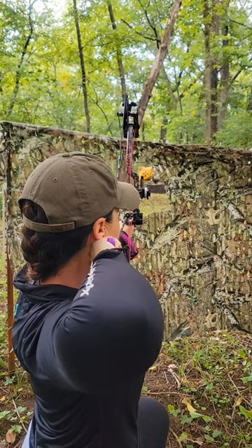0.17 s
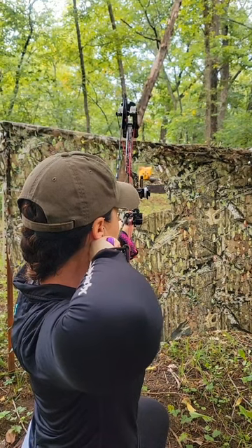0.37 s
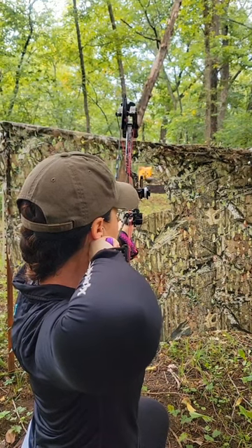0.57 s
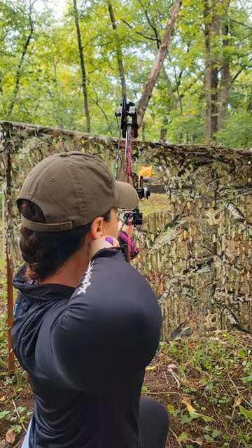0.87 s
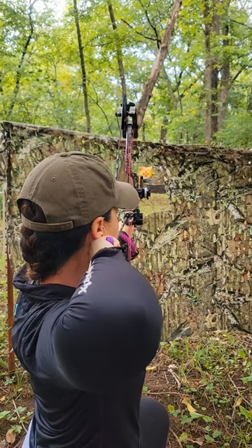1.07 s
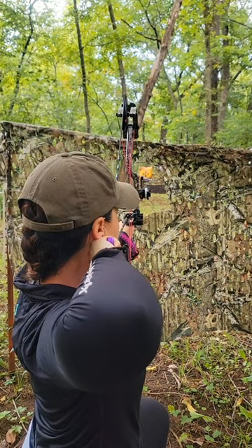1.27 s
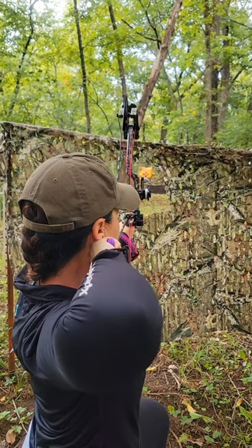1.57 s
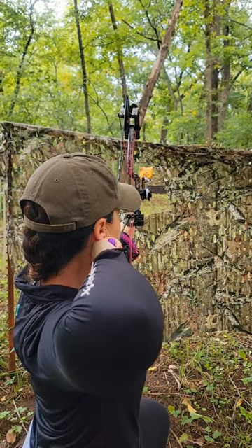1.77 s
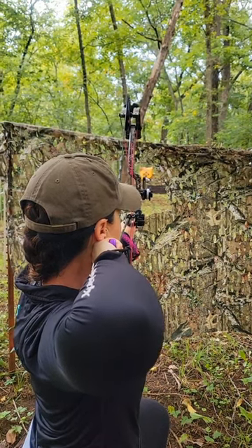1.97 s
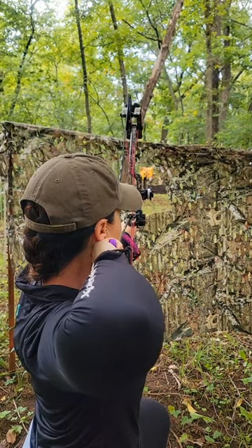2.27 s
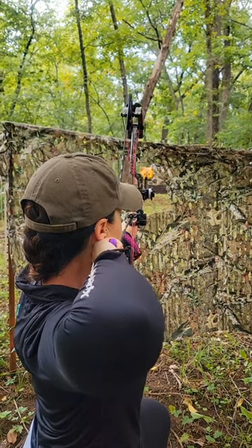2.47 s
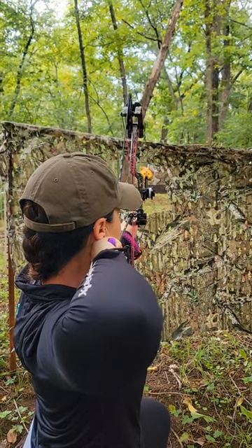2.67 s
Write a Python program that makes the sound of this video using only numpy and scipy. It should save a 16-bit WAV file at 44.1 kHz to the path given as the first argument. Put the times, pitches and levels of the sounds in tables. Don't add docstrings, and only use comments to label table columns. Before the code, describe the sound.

Cicadas buzz in a steady high chorus in the woods, over faint distant road noise

```python
import sys
import numpy as np
from scipy import signal
from scipy.fft import rfft, irfft
from scipy.io import wavfile
from scipy.ndimage import uniform_filter1d

SR = 44100
rng = np.random.default_rng(int(sys.argv[2]) if len(sys.argv) > 2 else 0)


def natural_amplitude(level_db):
    exponent = np.asarray(level_db, float) / 20
    return 10 ** exponent


def waveform_to_disk(signal):
    frames = np.transpose(np.atleast_2d(signal))
    scaled = np.clip(frames, -1, 1) * 32767
    samples = np.round(scaled).astype(np.int16)
    wavfile.write(sys.argv[1], SR, samples)


N = 124803


def evened(x):
    return x / np.sqrt(np.mean(x ** 2) + 1e-20)


def read(points, hz):
    f, value = np.transpose(points)
    return np.interp(np.log(hz + 1), np.log(f + 1), value)


def panned(x, db):
    return x * natural_amplitude([[db / 2], [-db / 2]])


def late(x):
    return np.array([np.roll(x, -3), x])


def coloured(x, points):
    hz = np.fft.rfftfreq(N, 1 / SR)
    inside = (hz > points[0][0]) & (hz < points[-1][0])
    return evened(irfft(rfft(x) * natural_amplitude(read(points, hz)) * inside, N))


def drift(top_hz):
    t = np.arange(N) / SR
    waves = [np.sin(2 * np.pi * (f * t + rng.random())) / np.sqrt(f) for f in np.geomspace(.4, top_hz, 16)]
    return evened(sum(waves))


def resonate(x, hz, width):
    turn = np.exp(2j * np.pi * np.cumsum(hz * np.ones(x.shape[-1])) / SR)
    r = np.exp(-np.pi * width / SR)
    return (turn * signal.lfilter([1], np.convolve([1, -r], [1, -r]), x / turn)).real


# (frequency [Hz], coherence [0-1])
COHERENCE = [(30, .84), (150, .8), (330, .6), (800, .52), (1500, .45), (2500, .3), (4000, .15), (5000, .0)]


def far_noise():
    hz = np.fft.rfftfreq(N, 1 / SR)
    own, common = rfft(rng.standard_normal((2, N)))
    same = np.clip(read(COHERENCE, hz), 0, 1)
    early = np.exp(2j * np.pi * hz * 7 / SR)
    left = same * common * early + np.sqrt(1 - same ** 2) * own
    return irfft(np.array([left, common]), N)


# (frequency [Hz], level [dB per Hz])
HISS = [(1500, 6.5), (3000, -6), (4300, -4), (7400, -3), (8600, 0.5), (10000, 0.5), (13500, 2), (15800, 0)]


def hiss():
    return natural_amplitude(-74) * panned(coloured(rng.standard_normal((2, N)), HISS), 3.5)


# (frequency [Hz], level [dB per Hz])
RUMBLE = [(12, -22), (20, -23.5), (44, 1), (60, 2.5), (107, -1.5), (163, -12), (188, -12), (221, -5),
          (330, -8.5), (430, -35), (730, -120)]
ROAR = [(150, -35), (250, -31), (375, -7), (431, -6.5), (511, -3.5), (600, -4), (1160, -5), (1650, -15.5),
        (3200, -54.5), (4160, -40), (7040, -120)]
# (frequency [Hz], width [Hz], level [dB])
HUMS = [(61.3, 9.7, -75), (104.9, 24, -83), (517.3, 4.1, -71.5), (806, 110, -67)]
# (loudest time [s], length [s], level [dB], drone [Hz], level of upper resonances [dB])
PASSES = [
    (0.496, .17, -55, 795, 1),
    (2.544, 0.11, -58, 769, -8.5),
]
# (multiple of drone [1], width [Hz], level [dB])
DRONE = [(1, 150, -1), (1.19, 150, 2), (1.38, 250, -3), (2.15, 300, -20)]


def road():
    t, air = np.arange(N) / SR, far_noise()
    out = natural_amplitude(-66 + 0.4 * drift(13)) * coloured(far_noise(), RUMBLE)
    out = out + natural_amplitude(-59.5 + 1.8 * drift(6.8)) * coloured(far_noise(), ROAR)
    out = out + sum(natural_amplitude(db) * evened(resonate(air, hz, w)) for hz, w, db in HUMS)
    for s, length, db, hz, upper_db in PASSES:
        drone = 0
        for multiple, width, level_db in DRONE:
            gain = natural_amplitude(level_db + upper_db * (multiple > 1.1))
            drone = drone + gain * evened(resonate(air, multiple * hz, width))
        out = out + natural_amplitude(db) * evened(drone) / (1 + ((t - s) / length) ** 2)
    return panned(out, -2.5)


# (time [s], level [dB], frequency [Hz], t60 [s])
TICKS = [
    (2.242, -64, 1850, .035),
    (2.635, -68, 2600, .035),
    (2.645, -79, 2850, .4),
]


def ticks():
    t, out = np.arange(N) / SR, 0
    for s, db, hz, t60 in TICKS:
        u = np.maximum(t - s, 0)
        envelope = np.minimum(u / 0.0011, 1) * natural_amplitude(db - 60 * u / t60)
        out = out + evened(resonate(rng.standard_normal(N), hz, 600)) * envelope
    return panned(late(out), -3)


# (start [s], level [dB], frequency [Hz], t60 [s])
CAWS = [
    (1.135, -70, 2020, 1.8),
    (1.57, -76, 2200, 1.2),
]


def caws():
    t, out = np.arange(N) / SR, 0
    fall_per_s, width_hz, attack_s, grain_db = 0.061, 350, 0.012, 2
    for s, db, hz, t60 in CAWS:
        u = np.maximum(t - s, 0)
        pitch = hz * (1 - fall_per_s * np.minimum(u, .5))
        rasp = evened(resonate(far_noise(), pitch, width_hz))
        grain = grain_db * evened(uniform_filter1d(rng.standard_normal(N), size=700))
        out = out + rasp * np.minimum(u / attack_s, 1) * natural_amplitude(db - 60 * u / t60 + grain)
    return panned(out, -1.9)


def woods(x):
    t = np.arange(SR // 2) / SR
    t60 = 0.66
    tail = rng.standard_normal((2, len(t))) * natural_amplitude(-60 * t / t60) * (t > .012)
    return signal.fftconvolve(x, tail / np.linalg.norm(tail[0]), axes=1)[:, :N]


# (start [s], length [s], level [dB], start frequency [Hz], left-right level [dB])
CHIRPS = [
    (0.426, 0.16, -70.5, 3345, 9),
    (1.745, 0.16, -68, 3347, 0.5),
    (2.697, 0.188, -68.5, 3330, 2),
]


def bird():
    t, out = np.arange(N) / SR, 0
    rise_hz, rough_hz, burr_hz, burr_depth = 190, 45, 108, .8
    peak_at, echo_db = .35, -2.5
    for s, length, db, hz, pan_db in CHIRPS:
        u = np.clip((t - s) / length, 0, 1)
        shape = np.sin(np.pi * u ** (np.log(.5) / np.log(peak_at))) ** 2
        rough = rough_hz * evened(uniform_filter1d(rng.standard_normal(N), size=150))
        tone = np.sin(2 * np.pi * np.cumsum(hz + rise_hz * u + rough) / SR)
        depth = burr_depth * np.minimum(0.15 + 3 * u, 1)
        burr = 1 + depth * np.sin(2 * np.pi * burr_hz * t)
        out = out + natural_amplitude(db) * panned(late(shape * tone * burr), pan_db)
    return out + natural_amplitude(echo_db) * woods(out)


# (place in the stroke [0-1], level [dB])
RIBS = [
    (0.042, -1.5),
    (.3, -17),
    (.55, -10),
    (0.798, -16),
]


def rib_strokes():
    strokes_per_s, rib_s, ring_db = 33.72, 0.0036, -22.5
    turn = np.arange(N) * strokes_per_s / SR - .012 + 0.0074 * drift(13)
    gate = natural_amplitude(ring_db)
    for at, db in RIBS:
        away_s = ((turn - at + .5) % 1 - .5) / strokes_per_s
        gate = gate + natural_amplitude(db) * np.exp(-.5 * (away_s / rib_s) ** 2)
    return evened(gate)


# (frequency [Hz], level [dB per Hz])
SONG = [(2790, -65), (4750, -35), (5110, -17), (5360, -9.5), (5540, -8.5), (5920, 7), (6290, 1),
        (7020, -17), (7300, -31), (9490, -69.5), (16100, -120)][1:-1]
OVERTONE = [(6060, -9), (10300, -10), (10900, 4), (11500, 14.5), (11900, 18.5), (13600, -2)]
# (frequency [Hz], width [Hz], level [dB], left-right level [dB])
BODIES = [(4600, 130, -89, -9.5), (5600, 92, -60.5, -10), (5706, 83, -59, -18.5), (6780, 75, -68, -8.5),
          (7230, 62, -81, -13)]
# (time [s], level [dB])
EFFORT = [(0, -48), (.2, -46.5), (.55, -48), (.9, -46.5), (1.05, -48), (1.3, -47), (1.7, -47.5),
          (2.0, -46.5), (2.35, -47.5), (2.6, -48), (2.83, -48)]


def cicadas():
    s, effort_db = np.transpose(EFFORT)
    effort = natural_amplitude(np.interp(np.arange(N) / SR, s, effort_db - effort_db.mean()))
    gate = rib_strokes()
    buzz = late(gate * rng.standard_normal(N))
    singer = natural_amplitude(-55) * panned(coloured(buzz, SONG), -18)
    chorus = natural_amplitude(-47.5) * panned(coloured(far_noise(), SONG), -3)
    rattle = gate * rng.standard_normal((2, N))
    bodies = 0
    for hz, width, db, pan_db in BODIES:
        bodies = bodies + natural_amplitude(db) * panned(evened(resonate(rattle, hz, width)), pan_db)
    over = coloured(.4 * buzz + rng.standard_normal((2, N)), OVERTONE)
    overtone = natural_amplitude(-71.5) * panned(over, -3)
    return effort * (singer + chorus + bodies + overtone)


def scene():
    return hiss() + road() + ticks() + caws() + bird() + cicadas()


def low_pass(x):
    return signal.sosfilt(signal.butter(12, 15725, fs=SR, output="sos"), x)


def record(dry):
    return low_pass(dry)


dry = scene()
out = record(dry)
waveform_to_disk(out)
```